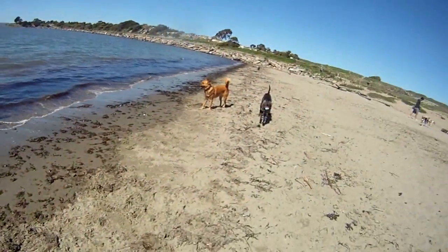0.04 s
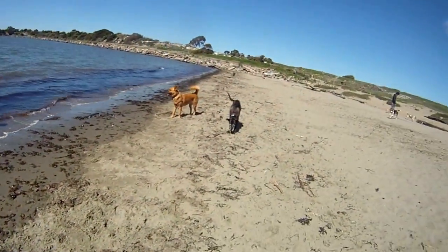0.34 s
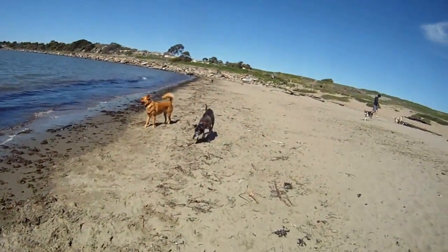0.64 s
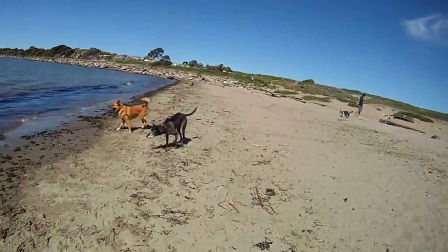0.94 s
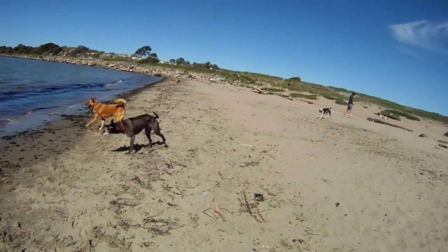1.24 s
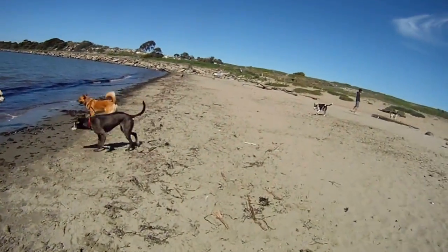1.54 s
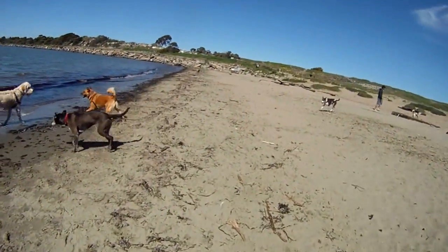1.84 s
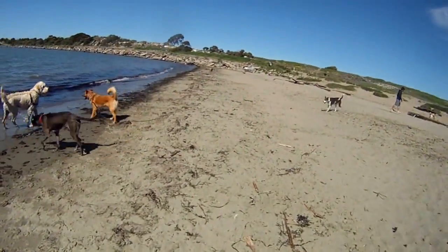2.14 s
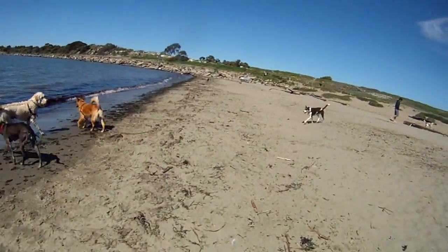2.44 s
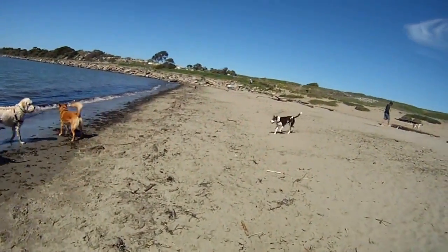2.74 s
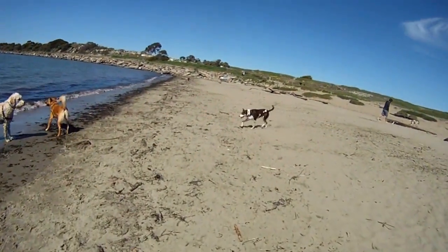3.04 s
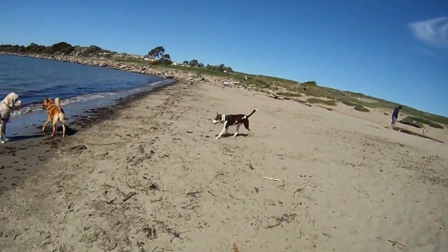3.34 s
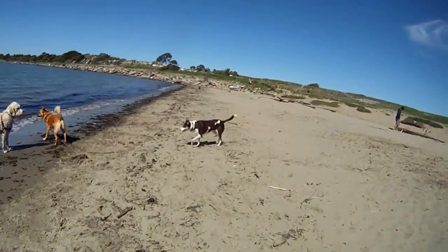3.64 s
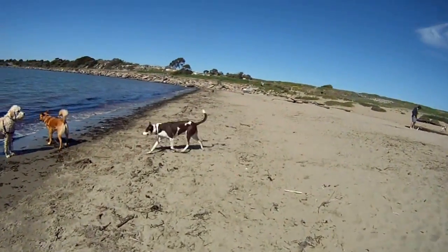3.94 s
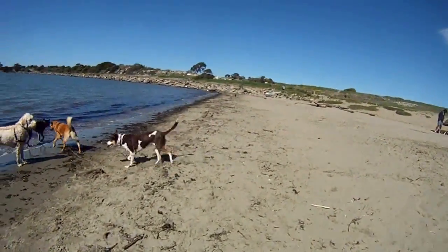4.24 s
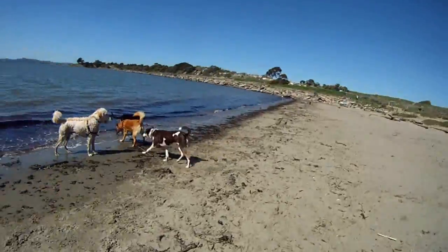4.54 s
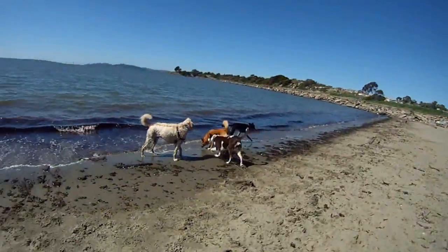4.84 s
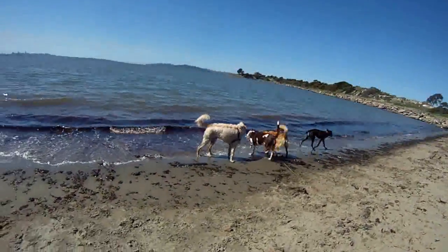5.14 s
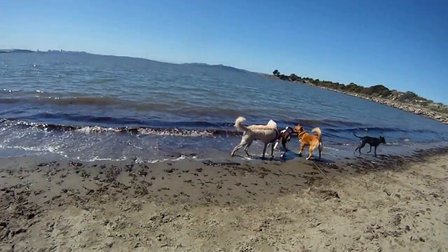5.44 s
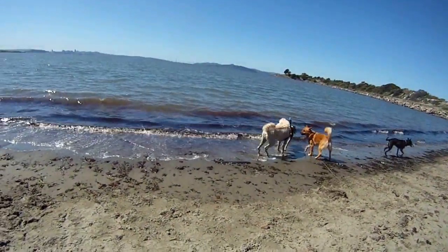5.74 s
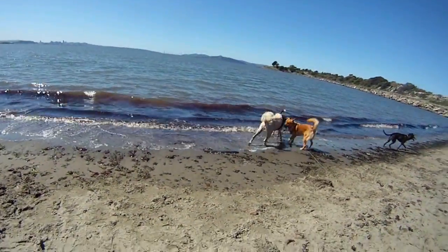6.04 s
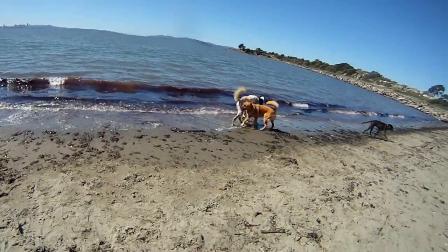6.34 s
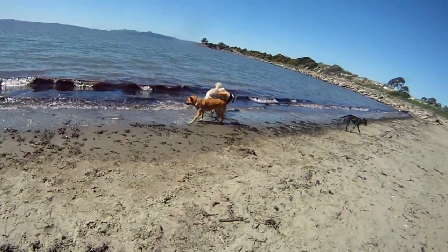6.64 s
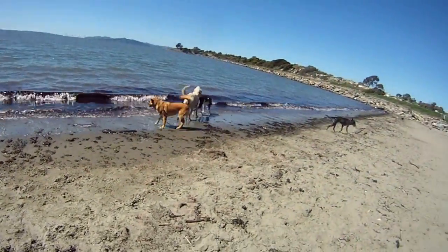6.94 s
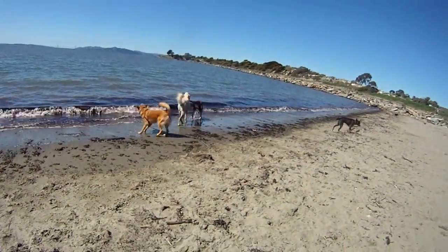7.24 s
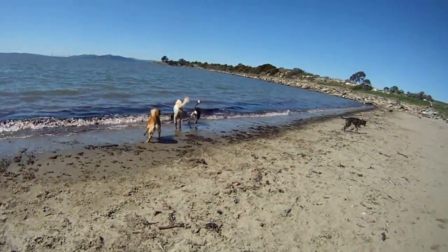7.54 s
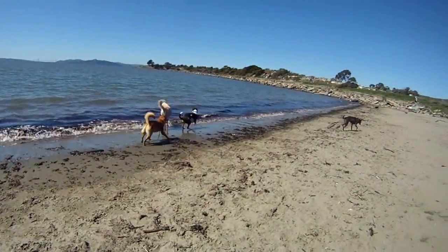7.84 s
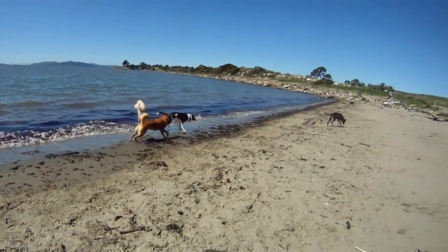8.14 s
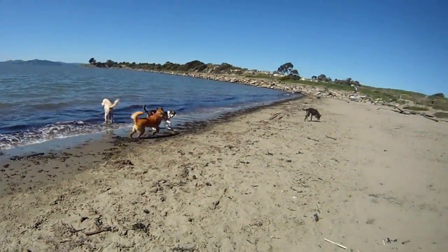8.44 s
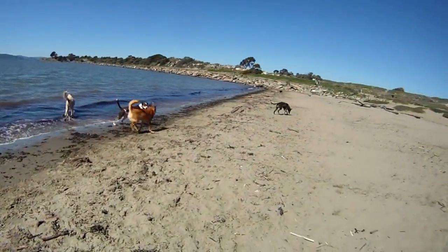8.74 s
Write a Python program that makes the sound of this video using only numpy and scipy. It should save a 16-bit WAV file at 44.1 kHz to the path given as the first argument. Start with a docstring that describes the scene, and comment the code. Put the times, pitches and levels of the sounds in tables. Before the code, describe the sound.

Someone walks on a sandy beach with a microphone worn on the body inside a closed plastic case. Each stride brings close, hollow knocks, gritty scrapes against clothing and low rumble, with faint crackles of sand underfoot. After about five seconds the walking stops. Small waves wash quietly on, sounding boxy, with a few soft gulps, swells of rumble and a couple of last bumps.

```python
"""A sandy beach, heard from a camera worn on the body, its microphone inside a closed plastic case.
For five seconds the wearer walks: each stride swings the case, which knocks on its mount, scrapes
gritty against clothing and rumbles, while dry sand and wrack crackle underfoot. Then the walker stops.
Small waves wash the shore, coloured by the hollow case, and air pockets gulp in them.
Right at the microphone come soft swells of rumble and a few last knocks and scrapes."""
import sys
import numpy as np
from scipy import signal
from scipy.fft import rfft, irfft
from scipy.io import wavfile

SR = 44100
rng = np.random.default_rng(int(sys.argv[2]) if len(sys.argv) > 2 else 0)


def to_wav(s):
    """Save 16-bit WAV."""
    ch = np.atleast_2d(s).T  # columns
    pcm = np.round(np.clip(ch, -1, 1) * 32767)  # PCM
    wavfile.write(sys.argv[1], SR, pcm.astype(np.int16))


N = 392049
TIME = np.arange(N) / SR
TAPS = 4096
BINS = np.fft.rfftfreq(TAPS, 1 / SR)
KNOCK_DB, KNOCK_HZ = -22, 1320  # the ring of an ordinary knock

# The case hits its mount. Each row: start in seconds, ring in dB, ring centre in Hz, thump in dB.
CASE_KNOCKS = [(0.2534, -45.5, 1890, -60), (0.3034, -18, 1420, -27), (0.3077, -18.5, 1150, -37),
               (0.4106, -37, 1100, -45), (0.7975, -23.5, 1300, -30.5), (1.0211, -31.5, 1330, -45),
               (1.1633, -33.5, 1120, -38), (1.5629, -36.5, 1040, -36), (2.0013, -18.5, 1290, -24),
               (2.0314, -12, 1410, -35), (2.0346, -14, 1380, -21.5), (2.09, -40, 1520, -43),
               (2.2579, -30.5, 1140, -33.5), (2.6425, -40, 1400, -47), (2.8602, -9.5, 1370, -24),
               (3.4355, -22, 1290, -37), (3.4752, -26.5, 1180, -32), (3.5518, -22, 1830, -31),
               (3.5543, -7, 1320, -33.5), (3.5557, -7.5, 1850, -12.5), (3.5912, -12, 1610, -20.5),
               (3.648, -24.5, 1340, -31), (3.731, -31.5, 1150, -50), (3.735, -30, 1120, -37),
               (3.747, -31.5, 1160, -30.5), (3.7532, -26.5, 1280, -40), (3.9053, -39, 1330, -38),
               (3.9126, -24, 1360, -30), (3.915, -26.5, 1360, -35), (4.15, -30.5, 1850, -40.5),
               (4.167, -21, 1260, -32.5), (4.1814, -24, 1870, -21.5), (4.234, -30, 1120, -43),
               (4.2426, -36, 1120, -40), (4.2608, -7.5, 1600, -14.5), (4.2836, -22, 1980, -45),
               (4.3223, -32, 1620, -50), (4.3378, -21.5, 1280, -38), (4.4031, -35, 1050, -42),
               (4.4356, -16.5, 1600, -23), (4.439, -19, 1610, -54), (4.9255, -39.5, 1140, -37.5),
               (4.9318, -26, 1200, -43), (4.9947, -50, 1131, -44.5), (6.2156, -32.5, 1512, -30),
               (6.2196, -22.5, 1243, -31), (8.7455, -31, 1138, -32)]


def gain_of(db):
    """Decibels to amplitude."""
    return 10 ** (np.asarray(db) / 20)


def evened(x):
    """Scales to an rms of 1."""
    return x / np.sqrt(np.mean(x ** 2) + 1e-20)


def add(mix, start_s, sound):
    """Mixes a sound in at its start time."""
    part = mix[max(round(start_s * SR), 0):][:len(sound)]
    part += sound[:len(part)]


def wander(size, per_s):
    """A random drift, rms near 1, that turns about per_s times a second."""
    knots = rng.standard_normal(size // 8 + 4)
    return np.interp(np.arange(size) * per_s / SR, np.arange(len(knots)), knots) * np.sqrt(3 / 2)


def swell(offset_s, rise_s, fall_s):
    """A bell of height 1 around offset zero, with its own rise and fall."""
    return np.exp(-(offset_s / np.where(offset_s < 0, rise_s, fall_s)) ** 2)


def grains(size, per_s, spread_db):
    """A random train of tiny clicks, a few much larger than the rest."""
    sizes = gain_of(spread_db * np.minimum(rng.exponential(1, size), 4))
    return sizes * rng.choice([-1, 1], size) * (rng.random(size) < per_s / SR)


def below(edge_hz, order):
    """Gain per bin of a low-pass; one minus it is the matching high-pass."""
    return 1 / (1 + (BINS / edge_hz) ** order)


def response(gain):
    """The minimum-phase impulse response that has this gain per bin."""
    cepstrum = irfft(np.log(np.maximum(gain, gain.max() * 1e-5)))
    cepstrum[1:TAPS // 2] *= 2
    cepstrum[TAPS // 2 + 1:] = 0
    return irfft(np.exp(rfft(cepstrum)))


def coloured(x, gain):
    """Filters x, tail included, to a power of 1 over the length of x."""
    y = signal.fftconvolve(x, response(gain))
    return y * np.sqrt(len(x) / (np.sum(y ** 2) + 1e-20))


def in_case(colour):
    """Gain per bin of a spectrum as it reaches the microphone through the hollow case."""
    # Resonances and notches of the case. Each row: centre in Hz, width in Hz, height in dB.
    resonances = [(963, 330, 7.5), (1273, 500, 6), (2077, 230.0, 6.5), (2365, 700, 13), (3702, 320, 7.5),
                  (6005, 730, -12), (8310, 660, 9), (9775, 740, 10), (11110, 910, 5), (11980, 1000, -16),
                  (13700, 710.0, 2), (14120, 580, 10)]
    bumps_db = sum(height * np.exp(-(2 * (BINS - centre) / width) ** 2)
                   for centre, width, height in resonances)
    hz, db = np.transpose(colour)
    return gain_of(np.interp(np.log(BINS + 1), np.log(hz), db) + bumps_db)


def wash(t, calm_db=-62.5):
    """Strength of the water at times t: each wave adds its power to the calm."""
    # Small waves. Each row: crest time in seconds, level in dB, run-up and retreat in seconds.
    waves = [(0.45, -60.5, .3, 0.8), (2.7, -55.5, 0.41, 0.53), (3.5, -54, 0.91, 0.33), (6.1, -60, 1.3, 1),
             (7.25, -53.5, 0.63, 0.71)]
    power = sum(gain_of(db) ** 2 * swell(t - s, rise_s, fall_s) for s, db, rise_s, fall_s in waves)
    return np.sqrt(gain_of(calm_db) ** 2 + power)


def surf(foam_db=-6.5, foam_lead_s=0.062, lap_db=0.77):
    """Small waves run up the sand: the foam on the crest fizzes just ahead of a soft, splashy wash."""
    # Surf outside the case. Each row: frequency in Hz, relative level in dB.
    spectrum = [(40, 3.5), (80, -3.5), (170, -10), (400, -12.5), (700, -14), (1000, -19), (1600, -18.5),
                (2300, -23), (3100, -18), (5000, -27), (8000, -31), (15300, -33)]
    colour = in_case(spectrum)
    low, high = below(440, order=4), 1 - below(2900, order=8)
    body_gain = colour * (1 - high) * (1 - below(50, order=2))
    # the bass comes on top of the body level
    depth = np.linalg.norm(body_gain) / np.linalg.norm(body_gain * (1 - low))
    body = depth * coloured(grains(N, per_s=7000, spread_db=2.5), body_gain)[:N]
    foam = gain_of(foam_db) * coloured(grains(N, per_s=14000, spread_db=2.5), colour * high)[:N]
    lapping = gain_of(lap_db * wander(N, per_s=26))
    return (body * wash(TIME) + foam * wash(TIME + foam_lead_s)) * lapping


def gulps(rise_s=0.0026, climb_per_s=5.5, trim_db=-0.5):
    """At the waterline, trapped bubbles ring briefly and climb in pitch as they rise."""
    # Air pockets in the waves. Each row: start in seconds, peak before the trim in dB, first pitch in Hz.
    bubbles = [(5.699, -55, 210), (6.09, -47, 247), (6.425, -50, 247), (7.129, -59, 242), (7.258, -46, 222),
               (7.475, -42, 306), (7.536, -46, 361.7)]
    t = np.arange(TAPS) / SR
    envelope = t / rise_s * np.exp(1 - t / rise_s)
    mix = np.zeros(N)
    for start_s, db, hz in bubbles:
        tone = np.sin(2 * np.pi * hz * t * (1 + climb_per_s * t / 2))
        add(mix, start_s, gain_of(db + trim_db) * envelope * tone)
    return mix


def rumble_swells(floor_db=-62.5, swell_s=0.058):
    """Power of a steady low rumble and its short swells, from strides swaying the camera and from wind."""
    # Short swells of low rumble. Each row: peak time in seconds, level in dB.
    rumble_peaks = [(0.26, -44), (1.12, -43), (4.58, -46.5), (5.45, -54), (6.95, -52), (7.12, -50.5),
                    (7.42, -51.5), (7.67, -54), (8.37, -46.5)]
    power = sum(gain_of(db) ** 2 * swell(TIME - s, swell_s, swell_s) for s, db in rumble_peaks)
    return gain_of(floor_db) ** 2 + power


def crackles(decay_s=0.003, trim_db=-13):
    """Dry sand and wrack underfoot: a few grains give way one after another."""
    # Crackles on the ground. Each row: start in seconds, level before the trim in dB.
    crunches = [(0.444, -45), (2.1585, -48), (2.6898, -47), (3.0934, -48), (3.8337, -46), (4.0828, -46.5),
                (4.5027, -44.5)]
    # A crackle outside the case. Each row: frequency in Hz, relative level in dB.
    spectrum = [(1500, -27), (3500, 5), (4600, -2), (7000, -2), (9000, -11), (15000, -20)]
    t = np.arange(TAPS // 8) / SR
    mix = np.zeros(N)
    for start_s, db in crunches:
        snaps = grains(len(t), per_s=3400, spread_db=2.0) * np.exp(-t / decay_s)
        add(mix, start_s, gain_of(db + trim_db) * coloured(snaps, in_case(spectrum)))
    return mix


def handling(rubs, span_s=0.27, lag_s=0.01):
    """How hard the case is being moved, in dB: the rubbing, smoothed and a little late."""
    window = signal.windows.hann(round(span_s * SR))
    power = abs(signal.fftconvolve(rubs ** 2, window / window.sum(), "same"))
    return np.interp(TIME - lag_s, TIME, 10 * np.log10(power + 1e-12))


def sway(handling_db, ordinary_handling_db=-42, sway_db=-47, lumps_db=3.5, drift_db=2.0):
    """Lumpy low rumble: the camera sways more the harder it is handled, with short swells on top."""
    # The rumble before the case colours it. Each row: frequency in Hz, relative level in dB.
    spectrum = [(8, -13), (20, 3), (40, -2.5), (75, -14), (140, -18.5), (300, -39.5), (900, -81)]
    motion = gain_of(sway_db + 0.7 * (handling_db - ordinary_handling_db))
    lumps = gain_of(lumps_db * wander(N, per_s=25) + drift_db * wander(N, per_s=6.5))
    rumble = coloured(rng.standard_normal(N), in_case(spectrum))[:N]
    return np.sqrt(motion ** 2 + rumble_swells()) * lumps * rumble


def scrape(length_s, rasp_db, ordinary_rasp_db=-44.5, slip_db=4.0, slips_per_s=260):
    """Grains catch and slip on the case, while the pressure of the stroke shakes it."""
    # The grit, and the shaking under it. Each row: frequency in Hz, relative level in dB.
    grit_spectrum = [(400, -27), (750, -11.5), (1100, 6), (1700, 4.5), (2400, -10), (3300, -9.5),
                     (3900, -11.5), (4500, -31.5), (7300, -30.5), (9000, -22), (11000, -14.5), (13500, -18),
                     (15300, -26)]
    shake_spectrum = [(10, -12.5), (25, -2), (50, -2.5), (80, 1.5), (120, -4.5), (170, -9.5), (260, -15.5),
                      (450, -18), (700, -25.5), (1500, -56.5)]
    size = round(length_s * SR)
    pressure_db = rasp_db - ordinary_rasp_db
    fizz_db, shake_db = -54.5 + pressure_db, -36 + 0.81 * pressure_db
    stroke = signal.windows.tukey(size, 0.7)
    grip = gain_of(slip_db * wander(size, slips_per_s))
    slips = stroke * grip * grains(size, per_s=4500, spread_db=2.5)
    colour, low = in_case(grit_spectrum), below(2900, order=12)
    sound = gain_of(rasp_db) * coloured(slips, colour * low)
    sound += gain_of(fizz_db) * coloured(slips, colour * (1 - low))
    shake = coloured(rng.standard_normal(size + TAPS), in_case(shake_spectrum))[TAPS:TAPS + size]
    add(sound, 0, gain_of(shake_db) * evened(stroke * shake))  # it shakes only while it is pressed
    return sound


def rubbing(skid_db=-50, skid_lead_s=0.011, skid_s=0.034):
    """Right at the microphone, the case scrapes on clothing and skids briefly around every knock."""
    # Rubs against clothing. Each row: start in seconds, length in seconds, rasp in dB.
    scrapes = [(0.21, 0.047, -59.5), (0.316, 0.053, -55.5), (0.598, 0.062, -37), (0.985, .057, -49),
               (1.064, 0.034, -54.5), (1.206, 0.062, -41), (1.296, 0.059, -39), (1.418, 0.045, -55.5),
               (1.965, 0.033, -48.5), (2.006, 0.048, -33.5), (2.055, .11, -53), (2.535, 0.12, -47.5),
               (2.703, 0.1, -52), (2.805, 0.052, -45), (2.889, 0.058, -42.5), (3.456, .07, -34),
               (3.533, 0.05, -33.5), (3.645, .04, -43), (3.767, 0.051, -58), (4.102, 0.049, -44.5),
               (4.166, 0.042, -35.5), (4.205, 0.058, -46), (4.269, 0.031, -35.5), (4.339, 0.051, -43.5),
               (4.411, 0.042, -45), (6.216, 0.065, -55.5), (8.334, 0.059, -57.5)]
    mix = np.zeros(N)
    for start_s, length_s, rasp_db in scrapes:
        add(mix, start_s, scrape(length_s, rasp_db))
    for knock_s, ring_db, *_ in CASE_KNOCKS:
        add(mix, knock_s - skid_lead_s, scrape(skid_s, skid_db + 0.55 * (ring_db - KNOCK_DB)))
    return mix


def ring(centre_hz, octaves=0.33, rise_s=0.00047, leak=0.11, scatter=1.4):
    """The struck case rings: the spot that is hit favours the modes near centre_hz."""
    # Modes of the case. Each row: frequency in Hz, width in Hz, relative level in dB.
    case_modes = [(560, 320, -8.5), (982, 120, 0.5), (1133.6, 167, 3.5), (1440, 150, -7), (1658, 193, -0.5),
                  (2005, 140, 1.5), (2467, 69, -3), (3020, 200, -3), (3660, 200, -1.5)]
    t = np.arange(TAPS) / SR
    hz, width, db = np.transpose(case_modes)[:, :, None]
    detune, phase = rng.uniform(-0.9, 1, (2, len(case_modes), 1))
    spot = leak + np.exp(-(np.log2(hz / centre_hz) / octaves) ** 2 / 2)
    swings = np.sin(2 * np.pi * hz * (1 + 0.008 * detune) * t + scatter * phase)
    modes = gain_of(db) * spot * np.exp(-np.pi * width * t) * swings
    return modes.sum(0) * (1 - np.exp(-(t / rise_s) ** 2))


def knock(ring_db, centre_hz, thump_db, chatter_s=0.0011, rattle=0.029, rattle_s=0.007, contact_s=0.005):
    """The case hits its mount, very close: a hollow ring, a click of plastic and a low thump."""
    # Click and thump before the case colours them. Each row: frequency in Hz, relative level in dB.
    click_spectrum = [(1500, -45.5), (2800, -9.5), (3200, 2), (3550, -4.5), (3950, -3), (4300, -22.5),
                      (7500, -21), (9000, -8), (10800, -3.5), (13500, -4.5), (15300, -9.5)]
    thump_spectrum = [(20, -19), (70, 5), (150, -2), (350, -4.5), (650, -8.5), (1000, -20), (2000, -52.5),
                      (4000, -81.5)]
    t = np.arange(TAPS) / SR
    # a harder spot rings higher and clicks more, by 12 dB an octave
    click_db = -35 + (ring_db - KNOCK_DB) + 12 * np.log2(centre_hz / KNOCK_HZ)
    # the surfaces chatter for about a millisecond, then a loose part rattles on
    chatter = t / chatter_s * np.exp(-t / chatter_s) + rattle * np.exp(-t / rattle_s)
    click = coloured(chatter * rng.standard_normal(TAPS), in_case(click_spectrum))[:TAPS]
    thump = response(in_case(thump_spectrum))
    sound = gain_of(ring_db) * evened(ring(centre_hz))
    sound += gain_of(click_db) * evened(click)
    sound += gain_of(thump_db) * evened(thump)
    return sound * np.sqrt(contact_s * SR / TAPS)  # the levels hold over the time of contact


def scene():
    """Shore, ground and case all reach one microphone, the same on both channels."""
    rubs = rubbing()
    mix = surf() + rubs + sway(handling(rubs))
    for start_s, ring_db, centre_hz, thump_db in CASE_KNOCKS:
        add(mix, start_s, knock(ring_db, centre_hz, thump_db))
    mix += crackles() + gulps()
    return np.array([mix, mix])


def record(dry, edge_hz=15650):
    """The hardest knocks overload the camera's input; a steep low-pass then cuts the top treble."""
    clipped = np.clip(dry, -1, 1)
    band_limit = signal.firwin(401, edge_hz, window=("kaiser", 8), fs=SR)
    return signal.oaconvolve(clipped, band_limit[None], "same")


dry = scene()
out = record(dry)
to_wav(out)
```